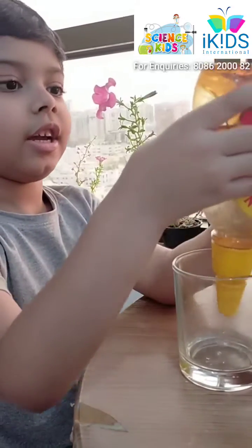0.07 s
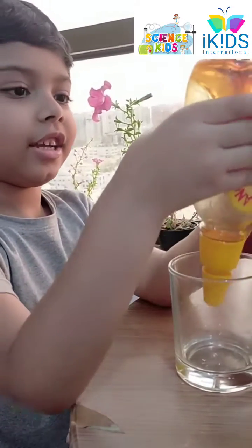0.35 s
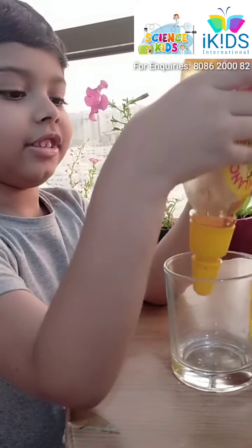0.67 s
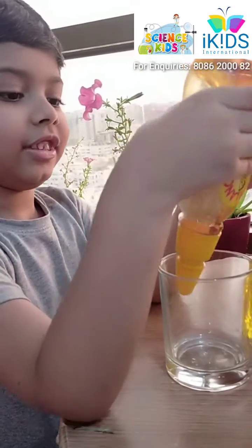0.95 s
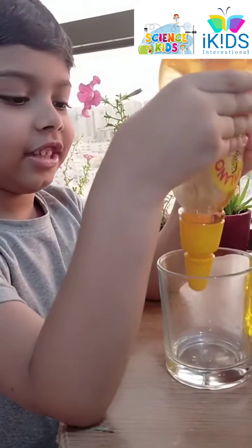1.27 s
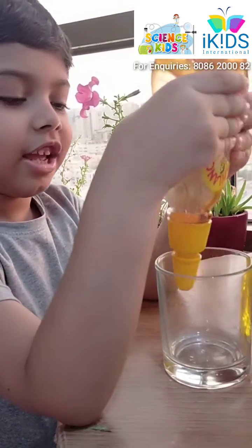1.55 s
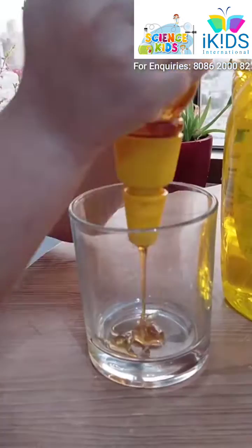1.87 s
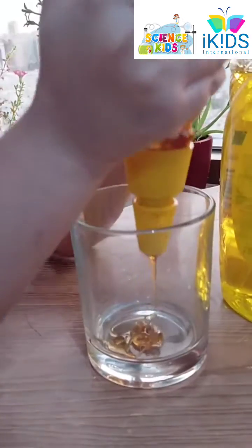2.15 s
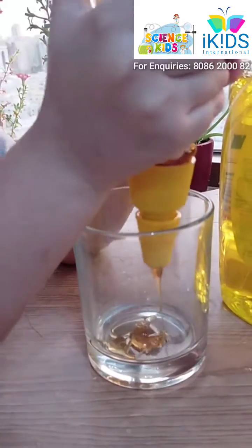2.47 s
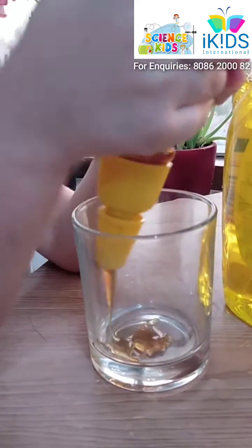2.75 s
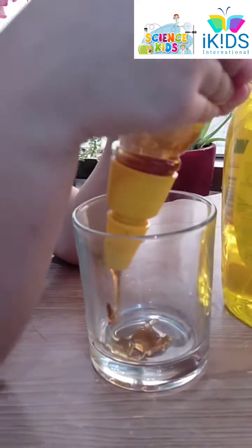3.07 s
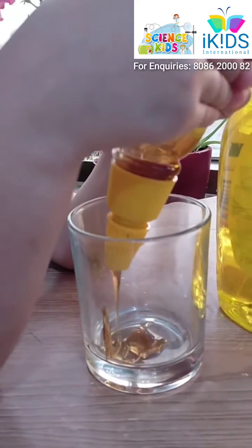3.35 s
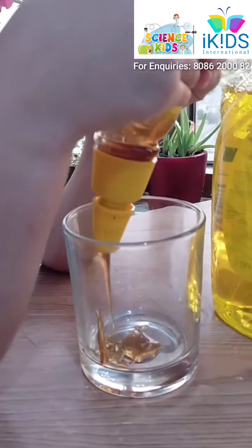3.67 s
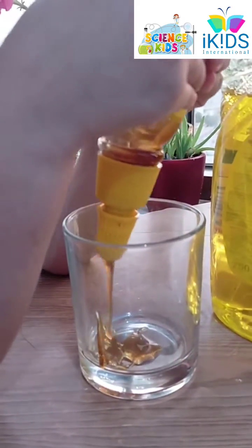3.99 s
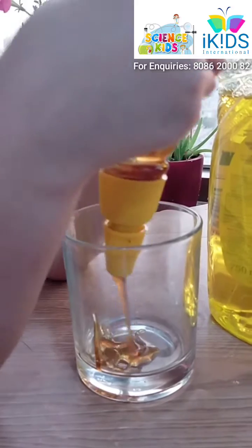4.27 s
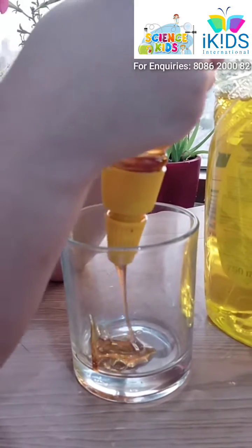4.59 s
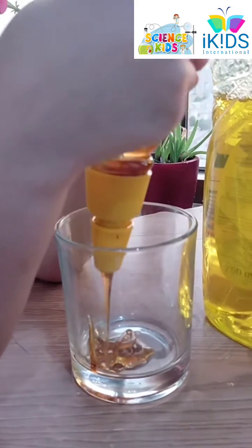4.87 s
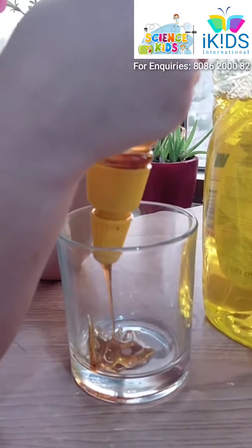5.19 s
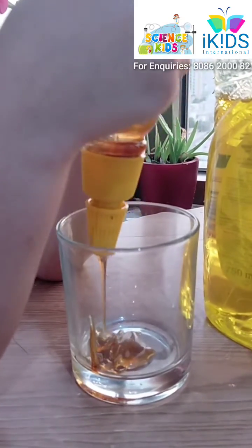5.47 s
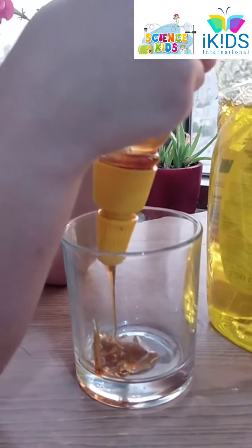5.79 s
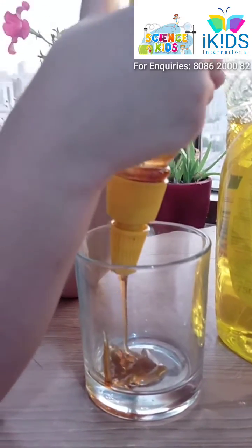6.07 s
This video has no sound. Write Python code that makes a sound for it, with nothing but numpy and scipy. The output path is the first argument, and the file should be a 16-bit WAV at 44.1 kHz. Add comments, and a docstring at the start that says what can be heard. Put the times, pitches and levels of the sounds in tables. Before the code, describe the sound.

A plastic squeeze bottle is handled in a small room, over a quiet low hum and steady room noise. For the first second and a half there are faint clicks and crackles of plastic under the fingers, a brief rub and a few soft bumps on a table. At about 1.7 seconds the bottle wall buckles with one loud, hollow pop that jolts the table; it is the loudest sound, and its short echo cuts off abruptly. At about 2.8 and 2.9 seconds the nozzle knocks twice on the rim of a drinking glass, the first tap stronger and ringing briefly. Faint crinkling and rubbing run from 2 to 5 seconds, with small clusters of crackles around 3.2 and 4.3 seconds. A barely audible squeak comes near 4.9 seconds and a last tiny click at 5.2, leaving only the hum until about 6 seconds.

```python
"""A plastic squeeze bottle buckles with one loud pop: its wall snaps through, rings and jolts the table.
It is held upside down in a drinking glass on that table, in a small room. The wall crackles under the
fingers; the nozzle strikes the rim and sets the glass ringing, rubs on it by stick-slip friction and
squeaks faintly. Soft bumps on the table, a low hum and room noise lie underneath."""
import sys
import numpy as np
from scipy import signal
from scipy.fft import rfft, irfft, next_fast_len
from scipy.io import wavfile
from scipy.ndimage import map_coordinates

SR = 44100
rng = np.random.default_rng(int(sys.argv[2]) if len(sys.argv) > 2 else 0)


def generate_wav(signal):
    """Clip the signal to [-1, 1] and save it as 16-bit WAV at the path in sys.argv[1]."""
    frames = np.transpose(np.atleast_2d(signal))
    scaled = np.clip(frames, -1, 1) * 32767
    pcm = np.round(scaled).astype(np.int16)
    wavfile.write(sys.argv[1], SR, pcm)


N = 270377

# Noise spectra, each with the columns frequency_hz, relative_density_db
SNAP = [(3500, -39), (5500, -10.5), (8300, 2.5), (9800, -4), (12000, 1.5), (15500, -0.5)]  # bright snap of plastic
WALL_RATTLE = [(900, -20.5), (1700, -2), (2700, -1.5), (3400, -8), (4100, -9.5), (5200, -18), (8000, -35)]  # mid-range rattle of the bottle wall
HOLLOW_KNOCK = [(80, 2), (200, 1), (330, 2.5), (550, -10.5), (810, 3), (980, -10), (1270, 1.5), (1600, -24),
                (2600, -40)]  # low, hollow part of a contact
HISS = [(2350, -36.5), (4000, -4), (5580, -9), (7700, -1), (9100, -5.5), (9810, -5.5), (12500, -0.5),
        (14000, -5), (14900, -0.5), (15800, -3)]  # treble of friction and of the background


def amp(db):
    """Amplitude ratio of a level in decibels."""
    return 10 ** (np.asarray(db) / 20)


def unit(x):
    """Normalisation to rms 1."""
    return x / np.sqrt(np.mean(x ** 2) + 1e-20)


def along(points, hz):
    """Interpolation of (frequency_hz, value) points on a logarithmic frequency axis."""
    frequencies, values = np.transpose(points)
    return np.interp(np.log(hz + 1), np.log(frequencies + 1), values)


def curves(rows):
    """Linear interpolation, sample by sample, of each column after the time."""
    times, *columns = np.transpose(rows)
    return [np.interp(np.arange(N) / SR, times, column) for column in columns]


def wobble(rate_hz):
    """Smooth random modulation: a spline through Gaussian values drawn at rate_hz."""
    return map_coordinates(rng.standard_normal(int(N * rate_hz / SR) + 4), [np.arange(N) * rate_hz / SR])


def noise(spectrum, size):
    """Spectral shaping of white noise, at rms 1."""
    gain = amp(along(spectrum, np.fft.rfftfreq(size, 1 / SR)))
    return unit(irfft(rfft(rng.standard_normal(size)) * gain, size))


def hit_time():
    """Time axis of one impact, in seconds."""
    return np.arange(SR // 2) / SR


def burst(spectrum, t60_s, rise_s):
    """A noise transient with a fast rise and exponential decay."""
    t = hit_time()
    return noise(spectrum, len(t)) * amp(-60 * t / t60_s) * (1 - np.exp(-t / rise_s))


def tap(spectrum):
    """A minimum-phase pulse of peak 1: folding the cepstrum makes it causal."""
    size = len(hit_time())
    cepstrum = irfft(np.log(amp(along(spectrum, np.fft.rfftfreq(size, 1 / SR)))), size)
    cepstrum[1:size // 2] *= 2
    cepstrum[size // 2:] = 0
    pulse = irfft(np.exp(rfft(cepstrum)), size)
    return pulse / np.abs(pulse).max()


def favour(centre_hz, extra_db):
    """Selective excitation: extra drive in dB, as a function of frequency, peaking at centre_hz."""
    return lambda hz: extra_db / (1 + (np.log2(hz / centre_hz) / 0.061) ** 2)


def ring(modes, attack_s, drive_db=lambda hz: 0):
    """Modal superposition: damped sinusoids of alternating sign and slightly random level."""
    t = hit_time()
    vibration = np.zeros(len(t))
    for k, (hz, db, t60_s) in enumerate(modes):
        envelope = amp(db + drive_db(hz) + rng.normal() - 60 * t / t60_s)
        vibration += (-1) ** k * envelope * np.sin(2 * np.pi * hz * t)
    return vibration * (1 - np.exp(-t / attack_s))


def tilt(db, bright_db):
    """Spectral tilt: treble and bass levels of a contact, the one rising as the other falls."""
    return db + bright_db, db - bright_db


def add(track, start_s, sound):
    """Superposition of a sound on the track."""
    part = track[max(round(start_s * SR), 0):][:len(sound)]
    part += sound[:len(part)]


def background():
    """Ambient noise floor: a randomly modulated hum over rumble, room noise and thin hiss."""
    # course of the background: time_s, hum_db, air_db, hiss_db
    levels = [(0.0, -68, -75, -86), (0.84, -66.5, -72, -86), (1.57, -76.5, -76.5, -88),
              (1.91, -65, -73, -84.5), (2.78, -63.5, -75, -83), (3.41, -62.5, -70.5, -86.5),
              (3.84, -60, -74, -85.5), (6.13, -71, -77, -90)]
    # room noise and deep rumble: frequency_hz, relative_density_db
    air_spectrum = [(47, -32.5), (80, 2.5), (128, -8), (182, 2), (216, -8.5), (291, -6), (385, -13),
                    (447, -11.5), (592, -16), (946, -14.5), (3570, -25), (5290, -38.5), (7000, -45),
                    (9100, -57.5), (15400, -120)]
    rumble_spectrum = [(4, 6), (15, 4), (25, -5.5), (60, -5.5), (100, -17), (200, -52)]
    hum_db, air_db, hiss_db = curves(levels)
    hum_gain = amp(hum_db + 4 + 1.4 * wobble(9.2))
    hum_hz = 49 + 0.8 * wobble(9)
    hum = hum_gain * np.sin(2 * np.pi * np.cumsum(hum_hz) / SR)
    rumble = amp(hum_db - 0.5) * noise(rumble_spectrum, N)
    air = amp(air_db + 1 + 1.1 * wobble(7.8)) * noise(air_spectrum, N)
    hiss = amp(hiss_db + 1.84 + 0.75 * wobble(60)) * noise(HISS, N)
    return hum + rumble + air + hiss


def squeak():
    """A faint harmonic series sags in pitch and recovers; two high harmonics whistle and fade."""
    # sustained and fading partials: harmonic_number, level_db
    harmonics = [(1, 4.5), (2, -11), (3, -10), (4, -13), (5, -14)]
    whistles = [(9, -2), (11, 1)]
    start_s, length_s, attack_s, release_s = 4.916, 0.096, 0.008, 0.025
    ends_hz, sag_hz = 805, 36
    gain_db, fade_db_per_s = -77, 190
    t = np.clip(np.arange(N) / SR - start_s, 0, length_s)
    envelope = np.minimum(1, np.minimum(t / attack_s, (length_s - t) / release_s))
    jitter = 1 + 0.0099 * wobble(900)
    pitch_hz = (ends_hz - sag_hz * np.sin(np.pi * t / length_s)) * jitter
    phase = 2 * np.pi * np.cumsum(pitch_hz) / SR
    tone = sum(amp(db) * np.sin(k * phase) for k, db in harmonics)
    whistle = sum(amp(db) * np.sin(k * phase) for k, db in whistles)
    return amp(gain_db) * envelope * (tone + amp(-fade_db_per_s * t) * whistle)


def table_bumps():
    """Soft impacts excite the low, heavily damped modes of the table top."""
    # bumps: start_s, peak_db
    bumps = [(0.045, -48), (.338, -50.5), (.357, -54), (1.521, -50.5), (2.823, -59), (2.919, -49.5)]
    # modes of the table: frequency_hz, level_db, t60_s
    modes = [(103, 1, 0.072), (176, 0, 0.078), (234, -3, 0.044), (347, -7, 0.03)]
    out = np.zeros(N)
    for start_s, peak_db in bumps:
        wood = ring(modes, attack_s=0.001)
        add(out, start_s, amp(peak_db) * wood / np.abs(wood).max())
    return out


def rubbing():
    """Stick-slip friction: each stroke is a swell of tiny slips, hissing on the wall, hollow in glass."""
    # the grip slides and the nozzle drags on the rim: start_s, length_s, level_db, brightness_db
    strokes = [(0.244, 0.23, -78, 5), (2.173, 0.078, -79, 5.5), (2.327, .03, -75, -2.5),
               (2.408, 0.087, -76, 0.5), (2.679, .21, -79, 2.5), (3.213, 0.276, -79.5, -11),
               (4.302, .13, -75.5, -2.5), (4.669, 0.076, -82.5, 5.5)]
    slip_spread_db = 4.2
    hiss, scrape = np.zeros(N), np.zeros(N)
    for start_s, length_s, db, bright_db in strokes:
        hiss_db, scrape_db = tilt(db, bright_db)
        swell = np.sqrt(np.abs(np.hanning(int(length_s * SR))))
        add(hiss, start_s, amp(hiss_db) * swell)
        add(scrape, start_s, amp(scrape_db) * swell)
    slips = unit(amp(slip_spread_db * wobble(260)))
    return slips * (hiss * noise(HISS, N) + scrape * noise(HOLLOW_KNOCK, N))


def crinkle(count=30):
    """Local buckling: tiny creases tick in the wall at random, most often midway through the squeeze."""
    squeeze_start_s, squeeze_end_s = 2.0, 4.9
    smallest_db, range_db = -77, 11
    out = np.zeros(N)
    for when, scatter, size, bright in rng.random((count, 4)):
        start_s = np.interp((when + scatter) / 2, [0, 1], [squeeze_start_s, squeeze_end_s])
        rattle = burst(WALL_RATTLE, t60_s=0.028, rise_s=0.0013)
        knock = burst(HOLLOW_KNOCK, t60_s=0.045, rise_s=0.00059)
        snap = amp(-7.5 + 11 * bright) * burst(SNAP, t60_s=0.016, rise_s=0.00044)
        add(out, start_s, amp(smallest_db + range_db * size) * (rattle + knock + snap))
    return out


def crackles():
    """Impulsive excitation: each slip of the plastic snaps, rattles and knocks; sharp ticks ping."""
    # slips under the fingers and on the rim: start_s, level_db, brightness_db
    slips = [(0.3414, -59.5, 3.5), (0.7547, -70, 10.5), (0.783, -67, 0.5), (0.8032, -62.5, 8),
             (0.9119, -58.5, 7.5), (1.0453, -61.5, 5), (2.4337, -66.5, 4), (2.459, -60, 6),
             (3.2457, -56, -1.5), (3.273, -70, 2.5), (3.324, -68, 1), (3.841, -66.5, 5.5),
             (4.3056, -61, -9.5), (4.314, -59.5, -3.5), (4.3512, -60, -1.5), (4.37, -64.5, 2),
             (5.227, -67, 8)]
    # small sharp ticks: start_s, level_db, pitch_hz
    ticks = [(0.467, -51, 12500), (1.432, -58, 9570), (4.2454, -51.5, 4295)]
    out, t = np.zeros(N), hit_time()
    for start_s, db, bright_db in slips:
        snap_db, knock_db = tilt(db, bright_db)
        add(out, start_s, amp(snap_db) * burst(SNAP, t60_s=0.037, rise_s=0.002))
        add(out, start_s, amp(db + 3.5) * burst(WALL_RATTLE, t60_s=0.044, rise_s=0.0014))
        add(out, start_s, amp(knock_db + 2.5) * burst(HOLLOW_KNOCK, t60_s=0.064, rise_s=0.00073))
    for start_s, db, pitch_hz in ticks:
        ping = amp(-7 - 60 * t / 0.014) * np.sin(2 * np.pi * pitch_hz * t)
        add(out, start_s, amp(db) * (burst(SNAP, t60_s=0.011, rise_s=0.00059) + ping))
    return out


def glass_clinks():
    """Free vibration after impact: the nozzle knocks, and the spot it strikes weights the glass modes."""
    # the nozzle meets the rim: start_s, ring_db, knock_db, favoured_hz, extra_db
    impacts = [(2.8243, -30, -25.5, 2320, 11), (2.83, -58.5, -37, 2276, 4.5),
               (2.9131, -43, -34, 7700, 13.5), (2.9192, -46.5, -34, 7690, 15.5)]
    # modes of the glass: frequency_hz, level_db, t60_s
    modes = [(2240, -19.5, 0.4), (2276, -4.5, 0.042), (2530, -9, 0.023), (4544, -11, 0.086),
             (7750, -19.5, 0.076), (10500, -24, 0.054), (11600, -10, .072), (12600, -29, .07)]
    # dull knock of the nozzle: frequency_hz, relative_level_db
    nozzle_spectrum = [(60, -17), (180, -13), (350, -2), (520, -11.5), (750, 6.5), (1300, 3), (2300, 3),
                       (3100, -10.5), (6000, -27), (7900, -9.5), (9200, -26), (14500, -18.5), (16000, -33)]
    out = np.zeros(N)
    for start_s, ring_db, knock_db, favoured_hz, extra_db in impacts:
        ringing = ring(modes, attack_s=0.00034, drive_db=favour(favoured_hz, extra_db))
        knock = tap(nozzle_spectrum) + amp(-11) * burst(nozzle_spectrum, t60_s=0.044, rise_s=0.0004)
        add(out, start_s, amp(ring_db) * ringing + amp(knock_db) * knock)
    return out


def bottle_buckles():
    """Snap-through buckling: a wall panel gives way with a slap, rings, creases and jolts the table."""
    # three faint buckles, then the pop: start_s, ring_db, slap_db, crease_db, panel_hz, extra_db
    buckles = [(0.0451, -54, -82, -61, 3190, 27), (1.4907, -66.5, -65, -78, 2272, 7.5),
               (1.4948, -56, -83, -78, 2290, 11.5), (1.7339, -18.5, -12.5, -24.5, 1130, 3.5)]
    # low thud of the jolted table (four rows), then the bottle's modes: frequency_hz, level_db, t60_s
    modes = [(92, -25, 0.16), (173, -15, .12), (232.4, -15.5, 0.12), (351, -20, 0.098), (842, 0.5, 0.038),
             (1102, -5.5, 0.026), (2272, -14, 0.086), (2434, -10.5, 0.043), (2590, -15, 0.042),
             (3007, -11.5, .04), (3180, -18.5, .034), (3990, -8.5, 0.045), (4440, -19.5, 0.037),
             (7600, -26.5, 0.04), (8480, -23, 0.033), (10900, -26, .022)]
    # the slap of the wall and the creasing after it: frequency_hz, relative_level_db
    slap_spectrum = [(100, -24.5), (350, -21), (550, -25.5), (830, -6.5), (1200, 3), (1600, -4.5),
                     (2000, -7.5), (2700, -6.5), (4300, -18.5), (5500, -33), (8000, -34), (15000, -56)]
    crease_spectrum = [(60, -13), (200, -2.5), (380, -2), (520, -15.5), (700, -9), (950, -0.5), (1250, 1.5),
                       (1600, -12), (2300, -4.5), (3000, -6.5), (4100, -12), (5300, -30.5), (8500, -24),
                       (15800, -34)]
    out, slap = np.zeros(N), tap(slap_spectrum)
    for start_s, ring_db, slap_db, crease_db, panel_hz, extra_db in buckles:
        ringing = ring(modes, attack_s=0.0012, drive_db=favour(panel_hz, extra_db))
        add(out, start_s, amp(ring_db) * ringing + amp(slap_db) * slap)
        add(out, start_s + 0.001, amp(slap_db - 3.5) * slap)  # a reflection 1 ms later colours the pop
        add(out, start_s + 0.002, amp(crease_db) * burst(crease_spectrum, t60_s=0.045, rise_s=0.00042))
        add(out, start_s + 0.0032, amp(crease_db - 11) * burst(SNAP, t60_s=0.015, rise_s=0.00094))
    return out


def room(x, wet_db, build_s):
    """Reverberation: a diffuse tail builds up, then decays faster at higher frequencies."""
    # reverberation times of the small room: frequency_hz, t60_s
    decay_times = [(150, 0.87), (1000, 0.35), (4000, 0.33), (12000, 0.24)]
    hz, t, bands = signal.stft(rng.standard_normal(SR // 2), SR, nperseg=256)
    decay = amp(-60 * t / along(decay_times, hz)[:, None])
    tail = signal.istft(bands * decay, SR, nperseg=256)[1]
    tail *= 1 - np.exp(-np.arange(len(tail)) / SR / build_s)
    return x + amp(wet_db) * signal.fftconvolve(x, tail / np.linalg.norm(tail))[:N]


def scene():
    """Superposition of all sources on one channel; the pop's reverberation breaks off abruptly."""
    break_s, fade_s = 1.8455, 0.00048
    gate = np.clip((break_s - np.arange(N) / SR) / fade_s, 0, 1)
    pop = room(bottle_buckles(), wet_db=-14, build_s=0.011) * gate
    clinks = room(glass_clinks(), wet_db=-14, build_s=0.0088)
    handling = room(crackles() + crinkle() + rubbing() + table_bumps(), wet_db=-12, build_s=0.005)
    return (pop + clinks + handling + squeak() + background())[None]


def record(dry):
    """Band limiting: an ideal low-pass filter removes the highest treble."""
    cutoff_hz = 15700
    size = next_fast_len(N + SR // 2)
    passband = np.fft.rfftfreq(size, 1 / SR) < cutoff_hz
    return irfft(rfft(dry, size) * passband, size)[..., :N]


dry = scene()
out = record(dry)
generate_wav(out)
```